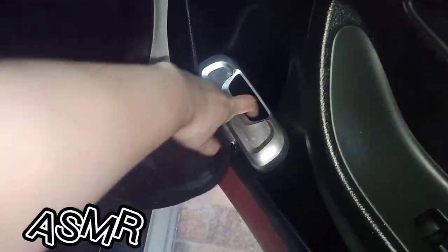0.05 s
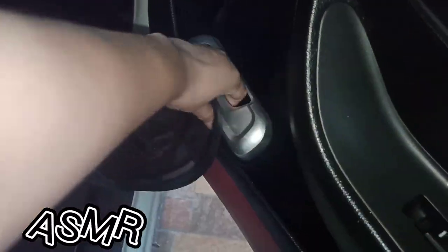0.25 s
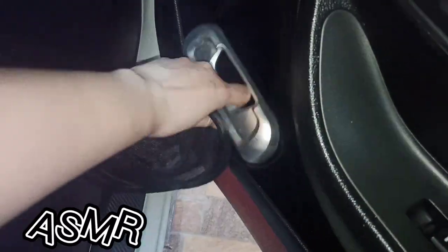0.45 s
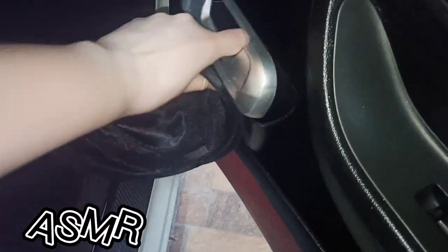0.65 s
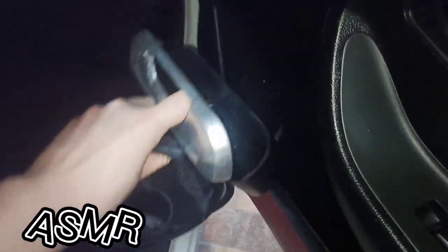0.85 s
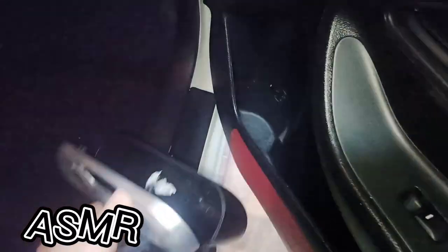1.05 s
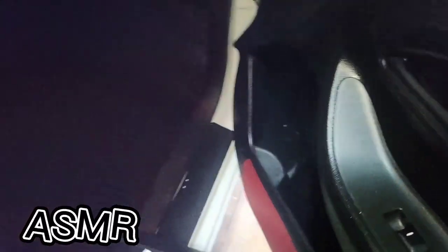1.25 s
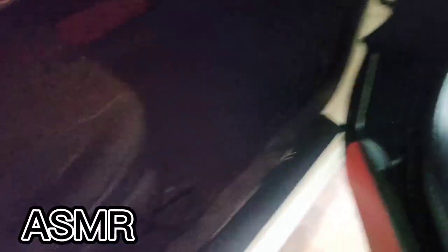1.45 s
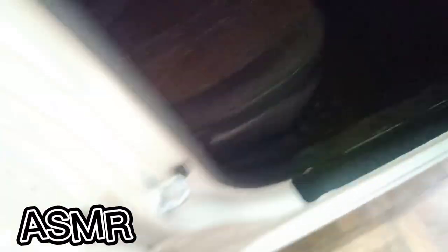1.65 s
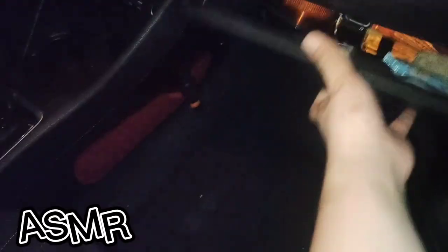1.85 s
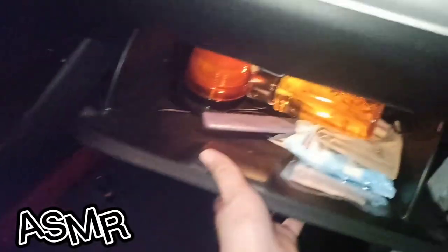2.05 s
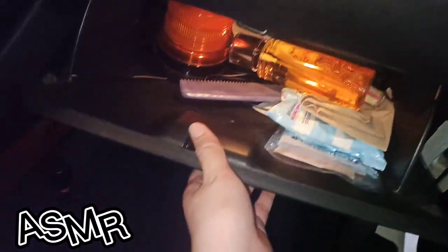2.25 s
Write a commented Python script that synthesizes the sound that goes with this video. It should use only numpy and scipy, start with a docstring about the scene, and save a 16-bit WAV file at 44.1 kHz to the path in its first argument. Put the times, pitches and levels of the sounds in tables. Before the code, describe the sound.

A plastic trim piece scrapes, knocks and groans as a hand works it loose in a car. Faint squeaks and a sleeve swish follow, then the glove box unlatches and drops open, its contents clicking in the small cabin.

```python
"""Inside a parked car a hand works a plastic trim piece loose: it scrapes, knocks and groans in its seat.
Faint squeaks follow and a sleeve swishes past, ending in a bright fizz. The level dips for an instant,
then the glove box unlatches, drops open with a low rumble and its contents click together.
Throughout, the small cabin adds a short, boomy tail, and a faint hiss lies underneath."""
import sys
import numpy as np
from scipy import signal
from scipy.io import wavfile
from scipy.ndimage import uniform_filter1d

SR = 44100
rng = np.random.default_rng(int(sys.argv[2]) if len(sys.argv) > 2 else 0)


def transcribe(u):
    """Save the signal u as a 16-bit wav file named by the first command-line argument.

    u: samples, shape (n,) or (channels, n), limited to [-1, 1]; the rate is SR.
    q: integer samples, one column per channel.
    """
    v = np.clip(np.atleast_2d(u).T, -1, 1)
    q = np.round(v * 32767).astype(np.int16)
    wavfile.write(sys.argv[1], SR, q)


N = 105840

# bright top end of the plastic's snap and the sleeve's fizz: frequency_hz, level_db
SNAP_SPECTRUM = [(2000, -31.5), (6000, -15), (8500, 7), (10500, 4.5), (13500, 6), (15000, 15), (16000, -4)]
DIP_START_S, DIP_END_S = 1.775, 1.786
LEAD_S = .03  # room for the build-up ahead of each blow


def amp(db):
    """Decibels to gain."""
    return 10 ** (np.asarray(db) / 20)


def unit_rms(x):
    """Scales to rms 1."""
    return x / np.sqrt(np.mean(x ** 2) + 1e-20)


def unit_peak(x, size=200):
    """Scales the loudest few milliseconds to rms 1."""
    return x / np.sqrt(uniform_filter1d(x ** 2, size).max() + 1e-20)


def value_at(points, hz):
    """Reads a curve on a log-frequency axis."""
    point_hz, value = np.transpose(points)
    return np.interp(np.log(hz + 1), np.log(point_hz), value)


def fader(points, column=1):
    """Gain per sample from one dB column of a timed curve."""
    rows = np.array(points)
    return amp(np.interp(np.arange(N) / SR, rows[:, 0], rows[:, column]))


def add(mix, start_s, sound):
    """Mixes a sound in at a time."""
    part = mix[max(round(start_s * SR), 0):][:len(sound)]
    part += sound[:len(part)]


def colour(spectrum, size=4096):
    """Causal impulse response with the given spectrum."""
    log_gain = np.log(amp(value_at(spectrum, abs(np.fft.fftfreq(size, 1 / SR)))))
    minimum_phase = np.exp(np.conj(signal.hilbert(log_gain)))
    return np.fft.ifft(minimum_phase).real[:size // 2]


def ring(modes, pitch=1, size=10000):
    """Impulse response of dying modes, their frequencies multiplied by pitch."""
    t = np.arange(size) / SR
    return sum((-1) ** k * amp(db) * np.exp(-np.log(1000) * t / t60) * np.sin(2 * np.pi * hz * pitch * t)
               for k, (hz, db, t60) in enumerate(modes))


def grains(size, per_s, spread_db):
    """Random tiny impacts of uneven size."""
    impacts = rng.choice([-1., 1.], size) * (rng.random(size) < per_s / SR)
    return impacts * amp(spread_db * np.minimum(rng.exponential(1, size), 4))


def rustle(spectrum, per_s, spread_db):
    """A steady stream of small slips in one colour."""
    return unit_rms(signal.fftconvolve(grains(N, per_s, spread_db), colour(spectrum))[:N])


def shifting(x, depth_db):
    """Resonances come and go as the point of contact moves."""
    bands = signal.stft(x, nperseg=256)[2]
    patches = uniform_filter1d(rng.standard_normal(bands.shape), size=4, axis=0)
    patches = unit_rms(uniform_filter1d(patches, size=18, axis=1))
    return unit_rms(signal.istft(bands * amp(depth_db * patches), nperseg=256)[1][:N])


def chatter(attack_s, decay_s, size=5000):
    """One blow inside a cluster of tiny contacts that builds up and dies away."""
    t = np.arange(size) / SR - LEAD_S
    envelope = np.exp(-np.where(t < 0, .5 * (t / attack_s) ** 2, t / decay_s))
    force = grains(size, per_s=8000, spread_db=3.5) * envelope
    force /= np.linalg.norm(force) + 1e-12
    force[round(LEAD_S * SR)] += 0.097  # the blow itself
    return force


def rubbing():
    """Sliding plastic scrapes and makes the hollow trim rumble."""
    # the hand's rubbing: time_s, rumble_db, scrape_db
    strokes = [(0, -91, -72), (.098, -69, -69), (.113, -44.5, -53), (.145, -49, -68), (.185, -68, -66),
               (.21, -39, -45.5), (.29, -37, -55), (.315, -46, -58.5), (.368, -35.5, -40.5),
               (.422, -36, -45.5), (.438, -22, -39.5), (.48, -45, -48.5), (.518, -36.5, -43),
               (.537, -26, -30.5), (.59, -33.5, -29), (.64, -27.5, -31), (.668, -42.5, -40),
               (.705, -29, -33), (.735, -40.5, -49), (.78, -47, -52.5), (.825, -60.5, -73.5),
               (.92, -82.5, -78.5), (1.775, -89, -75), (1.79, -62, -54), (1.848, -59.5, -53.5),
               (1.92, -37.5, -44), (1.95, -49, -48.5), (2.015, -51.5, -46), (2.06, -39.5, -51),
               (2.12, -38.5, -49.5), (2.17, -41.5, -58), (2.205, -47, -56), (2.24, -60.5, -57.5),
               (2.29, -85, -73), (2.4, -88, -86)]
    # body of the hollow trim: frequency_hz, level_db
    rumble_spectrum = [(25, -38), (50, -23), (85, -11.5), (118, 2), (170, -1), (240, -0.5), (380, -7.5),
                       (550, -16.5), (3000, -53.5)]
    # rasp of sliding plastic: frequency_hz, level_db
    scrape_spectrum = [(200, -11.5), (600, 3.5), (1250, 11), (1700, 8), (2600, 6), (5200, -2.5),
                       (6700, 1.5), (7700, -4.5), (9000, -17), (13500, -33), (15100, -10.5), (16000, -21.5)]
    rumble = rustle(rumble_spectrum, per_s=1500, spread_db=1.2)
    scrape = shifting(rustle(scrape_spectrum, per_s=14000, spread_db=4.5), depth_db=2.5)
    return fader(strokes, column=1) * rumble + fader(strokes, column=2) * scrape


def knocks():
    """Each knock booms the trim or glove box, rings a thin panel and cracks at the point of contact."""
    # plastic knocks: peak_s, attack_s, decay_s, thump_db, ring_db, ring_hz, crack_db, snap_db
    hits = [ (0.101, 0.0015, 0.0073, -65, -48.5, 1280, -42, -44.5),
            (0.195, 0.0017, 0.0037, -38, -37.5, 1335, -35, -54),
            (.201, 0.0037, 0.0085, -32, -35.5, 1270, -32.5, -52),
            (0.266, 0.0021, 0.019, -35, -47.5, 1330, -43, -76),
            (0.33, 0.0025, 0.0033, -54, -39, 1270, -42, -68),
            (0.343, 0.0036, 0.0057, -25, -33, 1326, -33.5, -56),
            (0.4319, 0.0029, 0.0066, -22.5, -27, 1010, -25, -45.5),
            (0.525, 0.0026, 0.0058, -20, -30.5, 1290, -30, -50.5),
            (.534, 0.0017, 0.011, -30, -41, 1280, -29.5, -42),
            (.546, 0.0012, 0.0037, -33, -28.5, 1330, -32, -47.5),
            (.56, 0.0024, 0.0037, -21.5, -26, 1220, -26.5, -39.5),
            (.612, 0.0039, 0.0014, -27, -20.5, 1248, -30, -42),
            (.615, 0.0024, 0.0035, -19, -19.5, 1275, -21.5, -41),
            (.637, 0.0039, 0.011, -24.5, -30.5, 1250, -28.5, -50),
            (.694, 0.01, 0.01, -25, -28.5, 1012, -31, -46.5),
            (.755, 0.0031, 0.0058, -41, -38.5, 1208, -42, -78),
            (1.8507, 0.00071, 0.024, -37.5, -40.5, 1260, -51, -95),
            (1.882, 0.0035, 0.0067, -27, -34, 1330, -34, -45.5),
            (1.889, 0.0043, 0.0091, -29, -27.5, 1340, -23, -39),
            (1.910, 0.0049, 0.0042, -61, -47, 1310, -33, -67.5),
            (1.954, 0.0015, 0.0053, -44, -43, 1450, -44, -53.5),
            (1.97, 0.0035, 0.016, -57, -52, 1410, -39.5, -80),
            (2.037, 0.0012, 0.011, -25.5, -33, 1380, -29.5, -43.5),
            (2.093, 0.0063, 0.019, -35.5, -51, 1330, -47, -82),
            (2.124, 0.0029, 0.0022, -40, -44, 1624, -37, -43.5),
            (2.188, 0.0015, 0.013, -63, -45, 1450, -45.5, -81),
            (2.253, 0.0038, 0.0042, -76, -44.5, 1390, -43, -70),
            (2.313, 0.0014, 0.009, -65, -56, 1257, -65, -90.5)]
    # boom of trim and dashboard: pitch_hz, level_db, t60_s
    trim_modes = [(111.7, -9, 0.084), (163, -7, 0.063), (213, -1.5, 0.037), (317, 0.5, 0.041),
                  (422.6, 0, 0.045), (500, -2, 0.015), (609, -5.5, 0.039), (770, -6, 0.035)]
    # boom of the glove box: pitch_hz, level_db, t60_s
    box_modes = [(121, -3, 0.072), (224, 4.5, 0.023), (347, -3, 0.046), (418, -1, 0.044), (578, -9, 0.017)]
    # ring of the thin panel: pitch_ratio, level_db, t60_s
    panel_modes = [(.72, -17, 0.011), (.95, -6, 0.01), (1.0, 8.5, 0.024)]
    # midrange bite of the contact: frequency_hz, level_db
    crack_spectrum = [(150, -29), (450, -20), (800, -8), (1300, -2), (1600, 4.5), (2300, 3), (3200, -0.5),
                      (5200, -3.5), (6600, -0.5), (7600, -8.5), (9000, -34.5), (16000, -52.5)]
    trim, box = ring(trim_modes), ring(box_modes)
    crack, snap = colour(crack_spectrum), colour(SNAP_SPECTRUM)
    out = np.zeros(N)
    for peak_s, attack_s, decay_s, thump_db, ring_db, ring_hz, crack_db, snap_db in hits:
        force = chatter(attack_s, decay_s)
        boom = trim if peak_s < DIP_START_S else box
        panel = ring(panel_modes, ring_hz)
        for body, db in (boom, thump_db), (panel, ring_db), (crack, crack_db), (snap, snap_db):
            add(out, peak_s - LEAD_S, amp(db) * unit_peak(signal.fftconvolve(force, body)))
    low_cut = signal.butter(2, 110, "highpass", fs=SR, output="sos")  # the knocks carry little deep bass
    return signal.sosfilt(low_cut, out)


def squeaks():
    """Stick-slip tones swell, arch and glide: groans from the pulled trim, a short bright crack, then thin,
    faint squeaks."""
    # sticking and slipping surfaces, and one bright crack of a knock near 0.79 s: middle_s, length_s, pitch_hz,
    # width_hz, glide_hz, level_db
    slips = [ (.556, .036, 1237, 300, -6, -24), (0.615, 0.098, 1257, 130, 43.5, -24),
             (.698, .04, 1165, 100, -8, -21), (0.791, 0.072, 6400, 3000, -5, -52),
             (1.002, 0.023, 802, 20, 1.5, -56), (1.068, 0.025, 5960, 940, -300, -57),
             (1.126, 0.034, 5950, 750, -300, -56.5), (1.185, 0.041, 12300, 600, 1999, -77),
             (1.285, 0.069, 762, 114, -53, -66.5), (1.29, 0.11, 10040, 110, 197, -67.5),
             (1.479, 0.062, 9820, 110, -150, -71), (1.531, 0.13, 2265, 220, 54, -55),
             (1.729, .14, 6340, 1950, -8, -51.5)]
    arch_depth = 0.037  # share of the pitch
    offset_hz = np.fft.fftfreq(SR, 1 / SR)
    out = np.zeros(N)
    for middle_s, length_s, pitch_hz, width_hz, glide_hz, db in slips:
        progress = np.arange(0, length_s, 1 / SR) / length_s
        arch = np.sin(np.pi * progress)
        # narrow noise roughens the tone into a band
        noise = rng.standard_normal(SR) + 1j * rng.standard_normal(SR)
        blur = np.fft.ifft(np.fft.fft(noise) / (1 + (2 * offset_hz / width_hz) ** 4))[:len(arch)]
        hz = pitch_hz * (1 + arch_depth * (arch - 1)) + glide_hz * (progress - .5)
        cycles = np.cumsum(hz) / SR
        tone = (blur / np.sqrt(abs(blur)) * np.exp(2j * np.pi * cycles)).real
        add(out, middle_s - length_s / 2, amp(db) * unit_peak(arch ** 2 * tone))
    return out


def sleeve():
    """Fine, dense friction of cloth with small crackles of its folds; it turns brighter at the end."""
    # the sleeve brushes past, catching twice: time_s, level_db
    swish_curve = [(1.1, -78), (1.17, -70.5), (1.24, -60.5), (1.332, -58), (1.338, -48.5), (1.346, -55),
                   (1.37, -56.5), (1.414, -58), (1.419, -49), (1.432, -53), (1.52, -57.5), (1.57, -51.5),
                   (1.62, -62), (1.69, -55.5), (1.77, -52.5), (1.8, -94)]
    # brushed cloth: frequency_hz, level_db
    cloth_spectrum = [(100, -13.5), (1150, -19), (1900, 1.5), (2800, -4), (3700, 0.5), (5000, -3),
                      (6500, -2), (7500, -6), (8700, -24.5), (13500, -28), (15100, -13.5), (16000, -25)]
    # bright fizz that ends the swish: time_s, level_db
    fizz_curve = [(1.57, -87), (1.68, -64.5), (1.752, -63), (1.775, -62), (1.786, -108)]
    friction = shifting(rustle(cloth_spectrum, per_s=13000, spread_db=0.97), depth_db=4.5)
    crackles = amp(-4) * rustle(cloth_spectrum, per_s=580, spread_db=3.5)
    fizz = rustle(SNAP_SPECTRUM, per_s=9000, spread_db=3)
    return fader(swish_curve) * unit_rms(friction + crackles) + fader(fizz_curve) * fizz


def glove_box_swing():
    """The glove box rumbles as it swings down."""
    # two swells of the swing: time_s, level_db
    swing_curve = [(1.78, -85), (1.89, -43), (2.0, -61), (2.1, -49), (2.27, -56), (2.4, -72)]
    # low body of the moving box: frequency_hz, level_db
    swing_spectrum = [(25, -20.5), (55, -6), (110, -1), (170, -16.5), (600, -61)]
    return fader(swing_curve) * rustle(swing_spectrum, per_s=3000, spread_db=1)


def latch():
    """The latch lets go: its handle ticks and rings in its hollow housing."""
    # ring of the housing: pitch_hz, level_db, t60_s
    housing_modes = [(350, -10, 0.057), (914, -2.5, .03), (1190, -2, 0.025), (1437, -5, 0.028),
                     (3280, -12.5, 0.046), (3970, -9, .01), (7100, -9, 0.011)]
    release_s = 1.801
    tick = signal.fftconvolve(chatter(attack_s=0.002, decay_s=0.0067), ring(housing_modes))
    out = np.zeros(N)
    add(out, release_s - LEAD_S, amp(-36) * unit_peak(tick))
    return out


def contents_clicks():
    """Hard objects tap each other as the glove box drops."""
    # taps between the contents: peak_s, level_db, decay_s
    taps = [(2.036, -39, 0.0012), (2.1184, -28.5, 0.0034), (2.2516, -29.5, 0.0016)]
    # ring of small, hard objects: pitch_hz, level_db, t60_s
    object_modes = [(2342, -10.5, 0.03), (4875, 1, 0.008), (5970, 0.5, 0.012), (6600, 3, 0.015),
                    (8140, 3.5, 0.0046), (10900, 0, 0.0015), (14800, 5, 0.0055)]
    out, body = np.zeros(N), ring(object_modes)
    for peak_s, db, decay_s in taps:
        click = signal.fftconvolve(chatter(attack_s=0.00085, decay_s=decay_s), body)
        add(out, peak_s - LEAD_S, amp(db) * unit_peak(click, size=100))
    return out


def cabin(x, size=22050):
    """Quick reflections from glass and dashboard, then a short tail."""
    # decay of the cabin, longest in the bass: frequency_hz, t60_s
    decay_times = [(100, .42), (300, 0.072), (1200, 0.22), (7000, 0.3), (15000, 0.16)]
    early_db, early_decay_s, tail_db = -10, 0.0071, -20
    t = np.arange(size) / SR
    early = grains(size, per_s=2500, spread_db=1) * np.exp(-t / early_decay_s) * (t > .0015)
    late = grains(size, per_s=4000, spread_db=0.74) * (t > .008)
    hz, frame_s, bands = signal.stft(late, SR, nperseg=256)
    fade = np.exp(-np.log(1000) * frame_s / value_at(decay_times, hz)[:, None])
    tail = signal.istft(bands * fade, SR, nperseg=256)[1][:size]
    response = amp(early_db) * early / np.linalg.norm(early) + amp(tail_db) * tail / np.linalg.norm(tail)
    return x + signal.fftconvolve(x, response)[:N]


def scene():
    """All the handling in the cabin, over a faint hiss."""
    # steady background hiss: frequency_hz, level_db
    hiss_spectrum = [(25, -24), (55, -0.5), (130, -7.5), (300, 2), (700, -12.5), (4500, -18.5),
                     (6700, -6.5), (8700, -24), (13500, -34), (15100, -17), (16000, -27.5)]
    handling = rubbing() + knocks() + squeaks() + sleeve()
    handling += glove_box_swing() + latch() + contents_clicks()
    hiss = amp(-73) * rustle(hiss_spectrum, per_s=41000, spread_db=0.63)
    return (cabin(handling) + hiss)[None]


def record(dry):
    """The level dips briefly just before the latch, and the highest treble is cut throughout."""
    dip_db, cutoff_hz = -24.5, 15750
    t = np.arange(N) / SR
    dip = np.where((t > DIP_START_S) & (t < DIP_END_S), amp(dip_db), 1)
    high_cut = signal.firwin(255, cutoff_hz, window=("kaiser", 8), fs=SR)
    return signal.oaconvolve(dry * dip, high_cut[None], "same")


dry = scene()
out = record(dry)
transcribe(out)
```